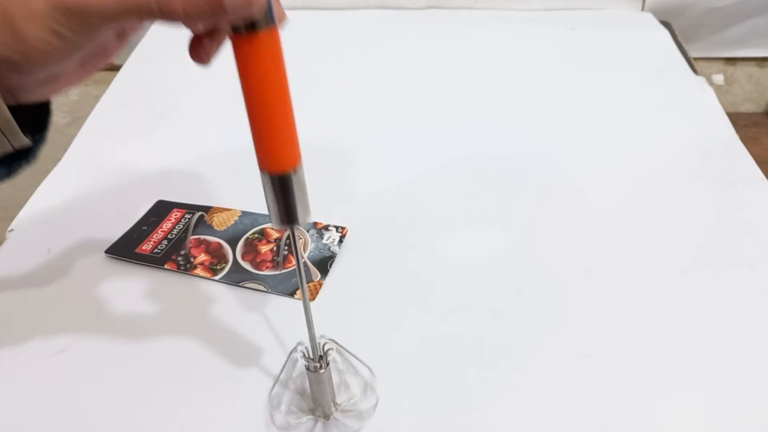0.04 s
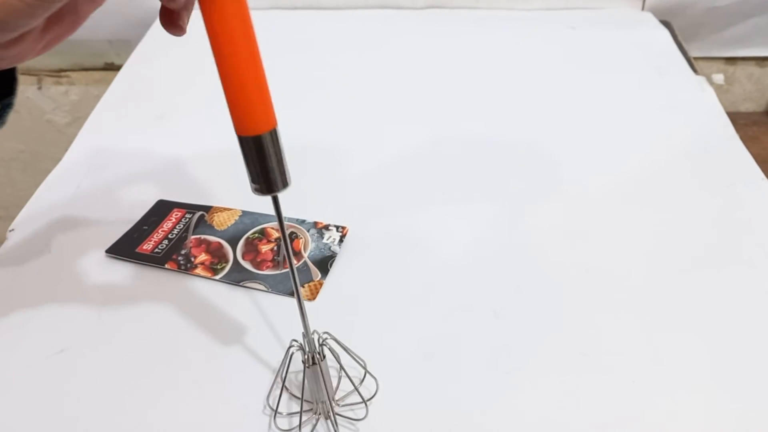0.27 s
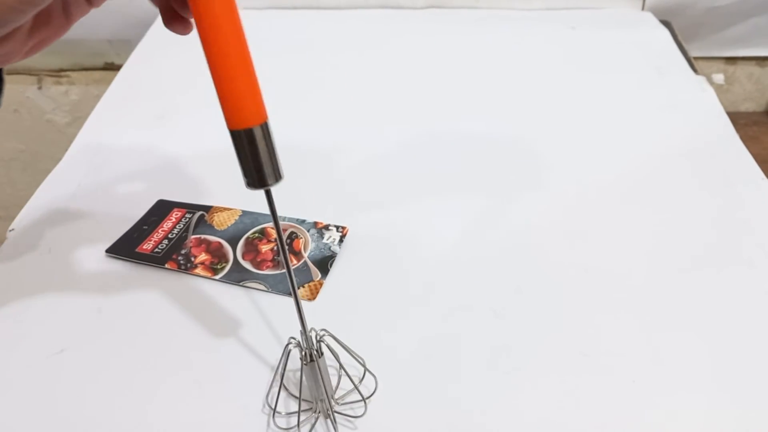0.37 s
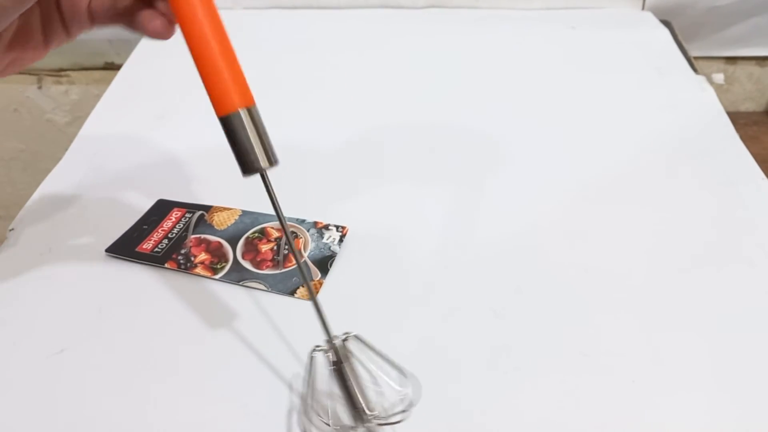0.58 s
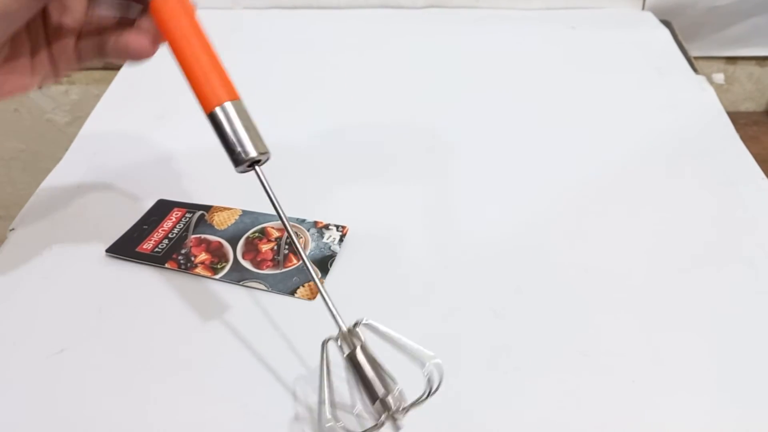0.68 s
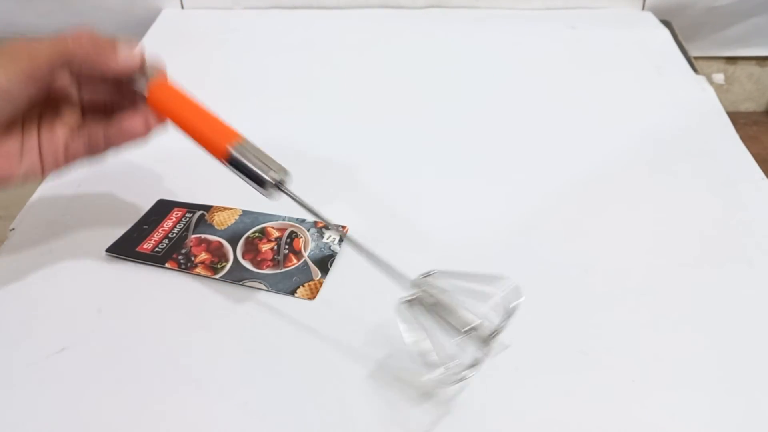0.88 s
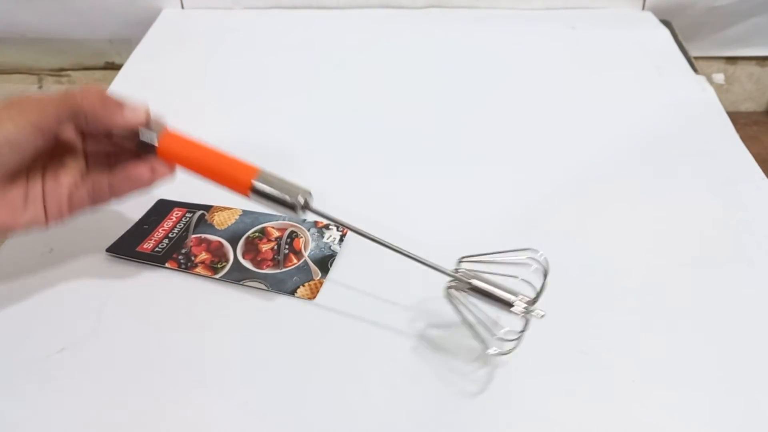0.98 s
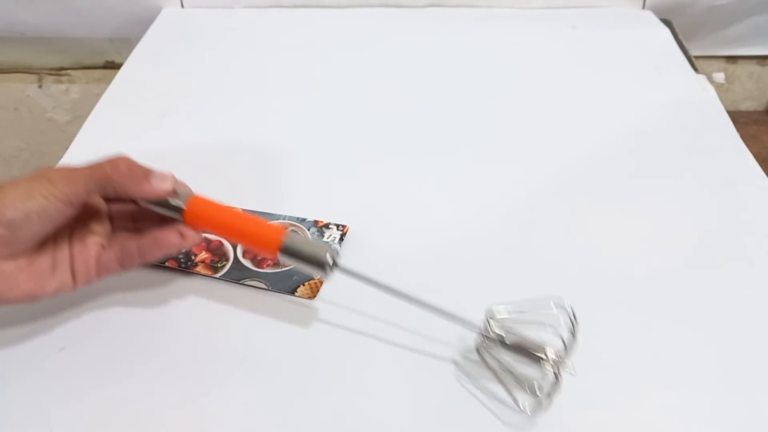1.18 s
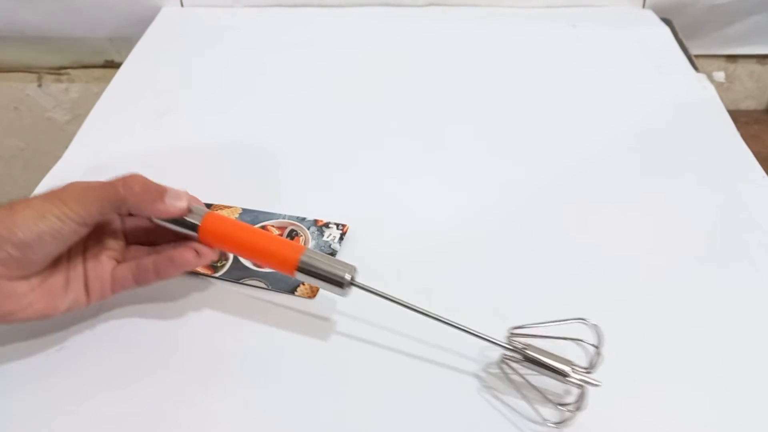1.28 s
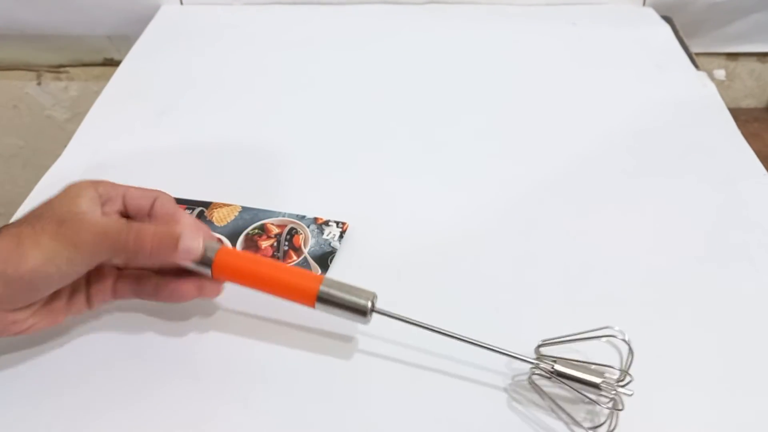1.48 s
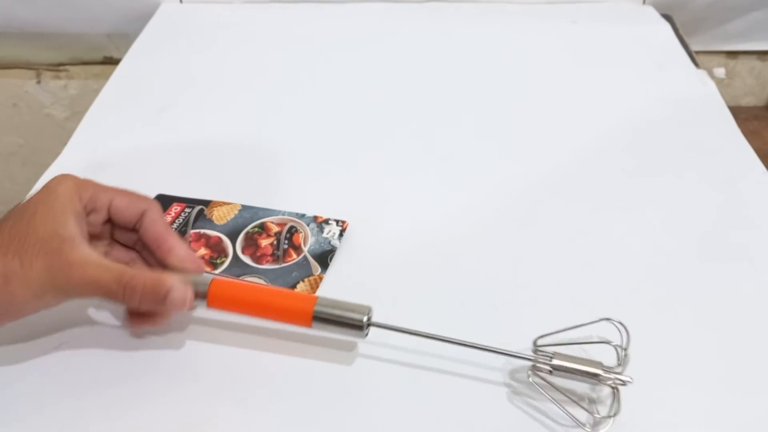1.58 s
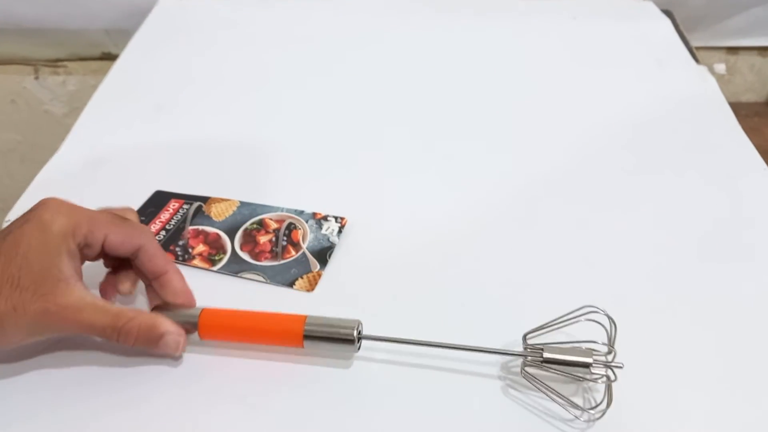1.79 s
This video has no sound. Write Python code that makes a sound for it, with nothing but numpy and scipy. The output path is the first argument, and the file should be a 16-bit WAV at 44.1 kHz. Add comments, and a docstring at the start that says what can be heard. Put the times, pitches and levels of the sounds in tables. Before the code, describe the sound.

A steel push whisk thumps on a tabletop, scrapes, clacks and is laid down.

```python
"""A small room, a stereo pair of microphones on a table where a steel push whisk is pressed down.
Sticking steel squeaks, parts click, and the whisk bottoms out with a thump that rings the table top.
The shaft scrapes back out of the sprung handle and clacks against its stop, shaking the wire cage;
then the whisk is laid down with light taps. Behind it the room rumbles and hums.
The right microphone hears little treble."""
import sys
import numpy as np
from scipy import signal
from scipy.fft import rfft, irfft, next_fast_len
from scipy.io import wavfile
from scipy.ndimage import map_coordinates

SR = 44100
rng = np.random.default_rng(int(sys.argv[2]) if len(sys.argv) > 2 else 0)


def waveform_to_disk(signal):
    """Save audio, clipped to [-1, 1], as 16-bit WAV at the path in sys.argv[1]."""
    frames = np.transpose(np.atleast_2d(signal))
    scaled = np.clip(frames, -1, 1) * 32767
    samples = np.round(scaled).astype(np.int16)
    wavfile.write(sys.argv[1], SR, samples)


N = 81585
RING_S, CRACK_S = .6, .08  # time allowed for a long and a short event to die away

# Blows on the table. Each row: start in seconds, level in dB, brightness in dB per octave,
# cut-off of the soft contact in Hz.
TABLE_BLOWS = [(.185, -34.5, 7, 1200), (0.223, -37.5, 8.5, 800), (.247, -22, 5.5, 2500),
               (0.2514, -10, 1, 2600), (1.1137, -35, -6, 650), (1.131, -37, -5, 496), (1.168, -46, 1, 450),
               (1.631, -52, -8, 600), (1.758, -56.5, 0, 777)]
# Modes of the table top. Each row: frequency in Hz, gain in dB, t60 in seconds.
TABLE_MODES = [(134.5, -17.5, 0.43), (196, -25, 0.59), (261, -19, 0.28), (281, -2.5, 0.09),
               (311.7, -5, 0.065), (394, -3, 0.034), (419, -31, 0.1), (528.7, -29, 0.39),
               (627.3, -30.5, 0.25), (734, -32, 0.13), (831, -20, 0.088), (892, -22.5, 0.062),
               (976, -29, 0.053), (1273, -27.5, 0.14), (1615, -37, 0.15)]
def knocks(rise_s=.0008, low_cut_hz=96, left_lag_s=.00022):
    """Each blow rings the table top, harder ones its upper modes; the right microphone hears it first."""
    out, t = np.zeros(N), seconds(RING_S)
    hz, mode_db, t60 = np.transpose(TABLE_MODES)
    modes = np.sin(2 * np.pi * hz[:, None] * t) * decay(t, t60[:, None]) * (1 - np.exp(-t / rise_s))
    octaves = np.log2(hz / hz[np.argmax(mode_db)])  # from the strongest mode
    for s, db, tilt, soft_hz in TABLE_BLOWS:
        force = amp(db + tilt * octaves) / (1 + (hz / soft_hz) ** 4)
        add(out, s, -(force * amp(mode_db)) @ modes)
    out = signal.sosfilt(signal.butter(4, low_cut_hz, "high", fs=SR, output="sos"), out)
    arrival = lambda f: np.exp(1j * np.pi * f * left_lag_s * np.array([[-1], [1]]))
    return filtered(in_room(out, room_db=-11), arrival)


# Steel parts meeting. Each row: start in seconds, level in dB, t60 in seconds, low cut in Hz,
# ring frequency in Hz, ring height in dB, room tail in dB.
STEEL_CONTACTS = [(0.0272, -50.5, 0.034, 246, 5600, 16.5, -2), (.031, -54, 0.019, 500, 11300, 24, -3.5),
                  (0.069, -62, .012, 400, 5820, 25, 0), (0.2468, -33.5, .016, 200, 1050, 6, -5),
                  (.2508, -44, 0.019, 200, 2940, 10, 6), (.228, -65, 0.017, 2120, 4950, 14.5, 0.5),
                  (.918, -68.5, 0.011, 2010, 4830, 17.5, 2.5), (1.1106, -52, 0.023, 300, 3950, 13.5, 7),
                  (1.121, -55, 0.0093, 153, 3440, 15, 10.5), (1.1314, -58, 0.0054, 150, 3000, -4, 2),
                  (1.3161, -50, 0.015, 3150, 3880, 9.5, -0.5), (1.566, -63, 0.0074, 2200, 3900, 17, -8)]
# The colour the handle gives them. Each row: frequency in Hz, gain in dB.
HANDLE_COLOUR = [(70, -28), (260, 9), (620, 10.5), (1250, 3), (2100, 4), (3100, -8.5), (5400, -5),
                 (8300, -21), (11700, -9.5), (15400, -22.5)]
def clicks(ring_octaves=.34):
    """Short cracks of steel on steel, damped by the hand and coloured by the handle."""
    out, t = np.zeros((2, N)), seconds(CRACK_S)
    for s, db, t60, low_hz, ring_hz, ring_db, room_db in STEEL_CONTACTS:
        def colour(hz):
            low_cut_db = -10 * np.log10(1 + (low_hz / (hz + low_hz / 10)) ** 8)
            peak_db = ring_db * bell(np.log2((hz + 1) / ring_hz) / ring_octaves)
            return causal(along(HANDLE_COLOUR, hz) + low_cut_db + peak_db)
        crack = 2 * rng.standard_normal(len(t)) * decay(t, t60)
        add(out, s, amp(db) * in_room(filtered(crack, colour), room_db))
    return out


# Pings in the sharpest clicks. Each row: start in seconds, level in dB, pitch in Hz, t60 in seconds.
STEEL_PINGS = [(0.0282, -51, 2295, 0.026), (1.316, -46.5, 2770, 0.0093), (1.3157, -47.5, 3750, 0.01)]
def pings():
    """A steel part rings briefly before the hand damps it."""
    out, t = np.zeros((2, N)), seconds(CRACK_S)
    for s, db, hz, t60 in STEEL_PINGS:
        ring = np.sin(2 * np.pi * hz * t) * decay(t, t60)
        add(out, s, amp(db) * in_room(ring, room_db=-3.5))
    return out


# Colour of the wire cage. Each row: frequency in Hz, relative level in dB.
WIRE_COLOUR = [(1500, -30), (3000, -5), (5500, 2), (8500, -11.5), (12000, -3), (15500, -6.5)]
def rattle(start_s=1.111, level_db=-48, rise_s=.015):
    """The shaft hits its stop and shakes the cage: many tiny contacts between the wire loops."""
    out, t = np.zeros((2, N)), seconds(RING_S)
    contacts = coloured(grains(len(t), per_s=2500), WIRE_COLOUR)
    shake = contacts * (1 - np.exp(-t / rise_s)) * decay(t, t60=.14)
    add(out, start_s, amp(level_db) * in_room(shake, room_db=0))
    return out


# The shaft sliding in the handle. Each row: time in seconds, level in dB.
SLIDE_LEVEL = [(0, -72.5), (.13, -89.5), (.16, -76), (.23, -78), (.38, -85), (.47, -75), (.57, -79),
               (.615, -67), (.67, -65), (.75, -69.5), (.91, -70), (.96, -73), (1.05, -68), (1.25, -69),
               (1.5, -71.5), (1.7, -75.5), (1.85, -80)]
# Resonances of the shaft. Each row: frequency in Hz, width in Hz, relative level in dB.
SHAFT_MODES = [(1720, 235, -5), (3760, 540, -3), (4940, 680, 3.5), (5470, 700, 4), (6750, 550, 4),
               (12900, 640, -1)]
def slide(extend_at_s=.67, blend_s=.071, dull_hz=4560, extended_db=1):
    """Dense friction grains ring the shaft, which sounds duller as it comes out of the handle."""
    def steel(f):
        return sum((-1) ** k * amp(db) * 1j * f * width / (hz * hz - f * f + 1j * f * width)
                   for k, (hz, width, db) in enumerate(SHAFT_MODES))
    bright = unit(filtered(grains(N, per_s=5500), steel))
    dull = amp(extended_db) * filtered(bright, lambda hz: 1 / np.sqrt(1 + (hz / dull_hz) ** 4))
    extended = .5 + .5 * np.tanh((np.arange(N) / SR - extend_at_s) / blend_s)
    scrape = bright * (1 - extended) + dull * extended
    level_db, = curves(SLIDE_LEVEL)
    return in_room(amp(level_db) * scrape, room_db=-5)


# Thin hiss of the shaft. Each row: time in seconds, level in dB.
SHEEN_LEVEL = [(.135, -98), (.16, -72.5), (.235, -77), (.28, -88), (.46, -91), (.53, -86), (.58, -84.5),
               (.63, -76), (.75, -80), (.95, -91), (1.1, -105)]
def sheen(centre_hz=12240, width_hz=880):
    """The highest band of the shaft's friction."""
    level_db, = curves(SHEEN_LEVEL)
    band = unit(filtered(rng.standard_normal(N), lambda hz: bell((hz - centre_hz) / width_hz)))
    return in_room(amp(level_db) * band, room_db=-12)


# Squeak of the shaft. Each row: time in seconds, pitch in Hz, level in dB.
SQUEAK_GLIDE = [(0, 12260, -61), (.025, 12170, -58), (.054, 11860, -61), (.069, 11380, -63)]
def squeak(roughness=.0059, release_db_per_s=2993):
    """A thin whistle of sticking steel that sags as the shaft slows, then stops."""
    hz, db = curves(SQUEAK_GLIDE)
    past_end_s = np.maximum(np.arange(N) / SR - SQUEAK_GLIDE[-1][0], 0)
    return amp(db - release_db_per_s * past_end_s) * wavering(hz, roughness, knots_per_s=900)


# Hand and whisk rubbing on the table. Each row: time in seconds, level in dB.
RUB_LEVEL = [(0, -52), (.025, -56.5), (.035, -42), (.1, -54), (.17, -54), (.21, -44.5), (.25, -44.5),
             (.55, -68), (.63, -62), (.72, -67.5), (1.0, -69.5), (1.2, -55.5), (1.38, -70), (1.49, -62),
             (1.63, -62.5), (1.69, -72.5), (1.85, -64)]
# Its place between the microphones. Each row: time in seconds, left minus right in dB.
RUB_BALANCE = [(0, -0.5), (1.3, -1), (1.55, -4.5), (1.85, -4)]
# Its colour. Each row: frequency in Hz, relative level in dB.
RUB_SPECTRUM = [(42, -25.5), (125, 6), (270, 1), (520, -4.5), (920, -19), (1650, -23.5), (4100, -60)]
def rubbing():
    """Dull friction on the table top, moving toward the right microphone near the end."""
    level_db, = curves(RUB_LEVEL)
    pan_db, = curves(RUB_BALANCE)
    return panned(amp(level_db) * coloured(diffuse(N), RUB_SPECTRUM), pan_db)


# Soft bumps on the table. Each row: start in seconds, level in dB, pitch in Hz, t60 in seconds,
# left minus right in dB.
SOFT_BUMPS = [(0.188, -41.5, 850, 0.033, 0), (1.116, -38, 201, 0.25, 1.5), (1.16, -42.5, 140.5, 0.28, -1),
              (1.5018, -42, 530, .011, -15.5), (1.535, -37.5, 80, 0.21, -2.5),
              (1.593, -40, 82.2, 0.19, -18.5), (1.795, -49.5, 87.4, 0.2, -15), (1.826, -38, 90.3, 0.22, -6)]
def bumps(rise_cycles=.65):
    """Hand and handle settle on the table, each touch one damped tone."""
    out, t = np.zeros((2, N)), seconds(RING_S)
    for s, db, hz, t60, pan_db in SOFT_BUMPS:
        bump = np.sin(2 * np.pi * hz * t) * (1 - np.exp(-t * hz / rise_cycles)) * decay(t, t60)
        add(out, s, panned(amp(db) * bump, pan_db))
    return out


# The room's rumble. Each row: frequency in Hz, relative level in dB.
RUMBLE_SPECTRUM = [(20, -11), (42, -36), (64, -5.5), (86, 5), (116, 0.5), (165, -9), (260, -8), (410, -36),
                   (820, -40.5), (2050, -40), (5100, -47.5)]
# The room's hum. Each row: time in seconds, level in dB.
HUM_LEVEL = [(0, -74.5), (.3, -56), (.6, -49), (.75, -61), (.87, -48), (1.0, -59.5), (1.1, -46),
             (1.22, -50.5), (1.4, -68), (1.85, -66)]
def room_tone(rumble_db=-53, hum_hz=110.7):
    """Low rumble around the microphones and a wavering hum in the centre."""
    hum_db, = curves(HUM_LEVEL)
    hum = unit(wavering(hum_hz, depth=.034, knots_per_s=16))
    return amp(rumble_db) * coloured(diffuse(N), RUMBLE_SPECTRUM) + amp(hum_db) * hum


# Reverberation of the small room. Each row: frequency in Hz, t60 in seconds.
ROOM_DECAY = [(110, 0.74), (310, 0.29), (1050, 0.43), (3100, .36), (6200, 0.17), (12500, 0.24)]
def in_room(x, room_db, build_s=.0062):
    """The direct sound reaches both microphones, then a diffuse tail whose bass lasts longest."""
    t = seconds(RING_S)
    hz, frames, bands = signal.stft(diffuse(len(t)), SR, nperseg=256)
    bands = bands * decay(frames, along(ROOM_DECAY, hz)[:, None])
    tail = signal.istft(bands, SR, nperseg=256)[1][:, :len(t)]
    tail *= 1 - np.exp(-(t / build_s) ** 2)
    out = amp(room_db) * signal.fftconvolve(x[None], tail / np.linalg.norm(tail[0]), axes=1)
    out[:, :len(x)] += x
    return out[:, :N]


# Likeness of the room at the two microphones. Each row: frequency in Hz, correlation.
MIC_LIKENESS = [(40, 0.31), (110, 0.99), (280, 0.75), (550, 0.56), (1000, 0.011), (2000, 0.25), (8000, 0)]
def diffuse(size):
    """White stereo noise, alike in the bass and unrelated in the treble."""
    def mix(hz):
        turn = np.arccos(np.clip(along(MIC_LIKENESS, hz), -1, 1)) / 2
        return np.array([np.cos(turn), np.sin(turn)])
    mid, side = filtered(rng.standard_normal((2, size)), mix)
    return np.array([mid + side, mid - side])


def amp(db):
    """Decibels to gain."""
    return 10 ** (np.asarray(db) / 20)


def unit(x):
    """Scale to rms 1."""
    return x / np.sqrt(np.mean(x ** 2) + 1e-20)


def bell(x):
    """Gaussian curve of height 1."""
    return np.exp(-.5 * x ** 2)


def seconds(length_s):
    """Time axis of one event."""
    return np.arange(round(length_s * SR)) / SR


def decay(t, t60):
    """Falls by 60 dB in t60."""
    return np.exp(-np.log(1000) * t / t60)


def along(points, hz):
    """Interpolate (Hz, value) points on a log axis."""
    f, values = np.transpose(points)
    return np.interp(np.log(hz + 1), np.log(f + 1), values)


def curves(rows):
    """One value per sample for each column after the time."""
    s, *columns = np.transpose(rows)
    return [np.interp(np.arange(N) / SR, s, column) for column in columns]


def grains(size, per_s):
    """Impulses of random strength at random times."""
    return rng.standard_normal(size) * (rng.random(size) < per_s / SR)


def wavering(hz, depth, knots_per_s):
    """A sine whose pitch wanders along a smooth random curve."""
    wobble = map_coordinates(rng.standard_normal(N // 8), [np.arange(N) * knots_per_s / SR], mode="mirror")
    return np.sin(2 * np.pi * np.cumsum(hz * (1 + depth * wobble)) / SR)


def filtered(x, response):
    """Filter x by a gain given as a function of Hz."""
    n = x.shape[-1]
    padded = 2 * next_fast_len(n // 2 + 1024, True)
    return irfft(rfft(x, padded) * response(np.fft.rfftfreq(padded, 1 / SR)), padded)[..., :n]


def causal(db):
    """The minimum-phase response with these gains: it never sounds early."""
    cepstrum = irfft(db * np.log(10) / 20)
    half = len(cepstrum) // 2
    cepstrum[1:half] *= 2
    cepstrum[half + 1:] = 0
    return np.exp(rfft(cepstrum))


def coloured(x, spectrum):
    """Noise shaped by (Hz, dB) points, rms 1."""
    return unit(filtered(x, lambda hz: amp(along(spectrum, hz))))


def panned(x, pan_db):
    """Left louder than right by pan_db."""
    return x * amp(np.array([[.5], [-.5]]) * pan_db)


def add(out, s, x):
    """Mix x into out from time s on."""
    start = max(round(s * SR), 0)
    out[..., start:start + x.shape[-1]] += x[..., :N - start]


def scene():
    """The whisk in front, then the hand, then the room."""
    whisk = knocks() + clicks() + pings() + rattle() + slide() + sheen() + squeak()
    return whisk + rubbing() + bumps() + room_tone()


# Response of the right microphone. Each row: frequency in Hz, gain in dB.
RIGHT_RESPONSE = [(100, -0.8), (700, -1), (1300, -1.5), (2300, -4), (3200, -18.5), (4400, -21.5),
                  (6000, -30), (9000, -27), (15000, -28)]
# Hiss of both microphones. Each row: frequency in Hz, relative level in dB.
HISS_SPECTRUM = [(100, 31), (1000, 13.5), (3000, 3.5), (7000, 1.5), (8500, 2.5), (10000, 2), (12000, 9.5),
                 (15500, 0)]
def record(dry):
    """The right microphone is muffled; both hiss faintly and hear nothing above the band limit."""
    hiss_db, top_hz = -73.5, 15800
    heard = filtered(dry, lambda hz: np.array([np.ones_like(hz), amp(along(RIGHT_RESPONSE, hz))]))
    hiss = amp(hiss_db) * coloured(rng.standard_normal((2, N)), HISS_SPECTRUM)
    return filtered(heard + hiss, lambda hz: hz < top_hz)


dry = scene()
out = record(dry)
waveform_to_disk(out)
```